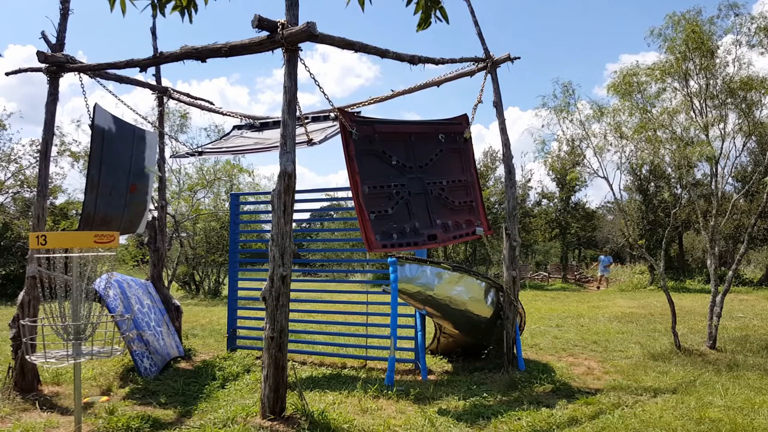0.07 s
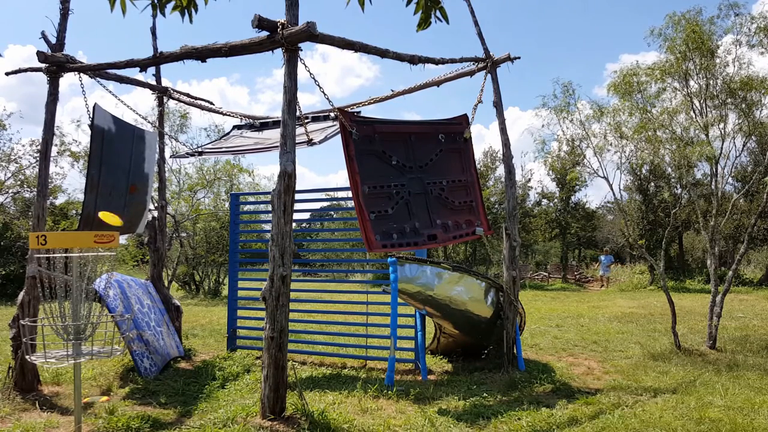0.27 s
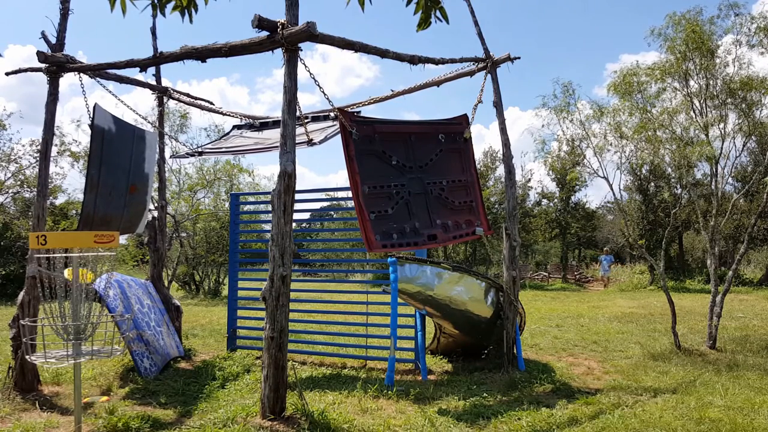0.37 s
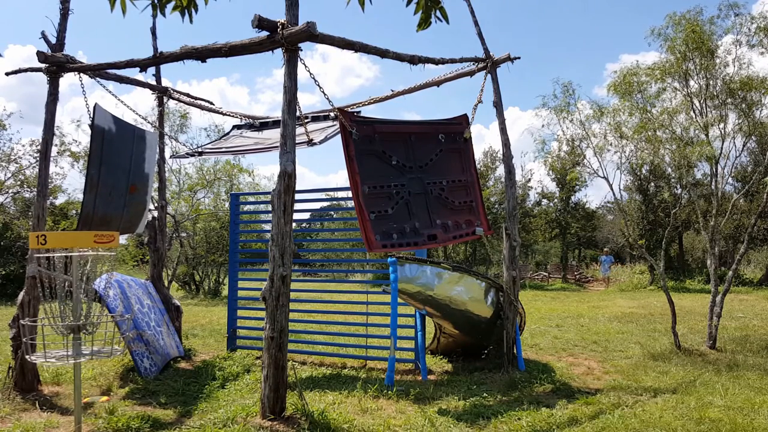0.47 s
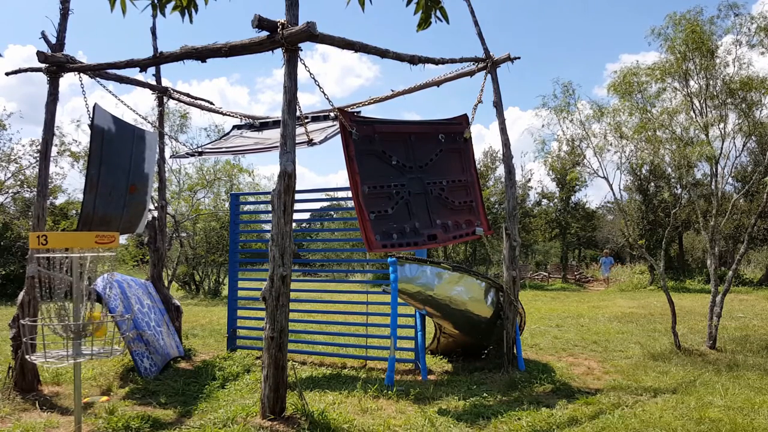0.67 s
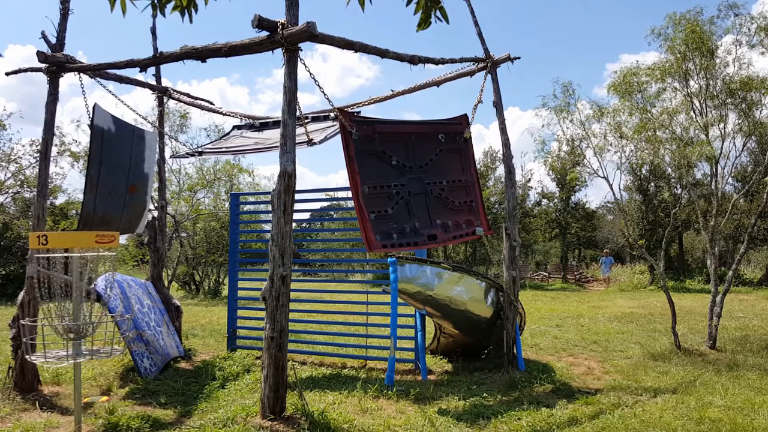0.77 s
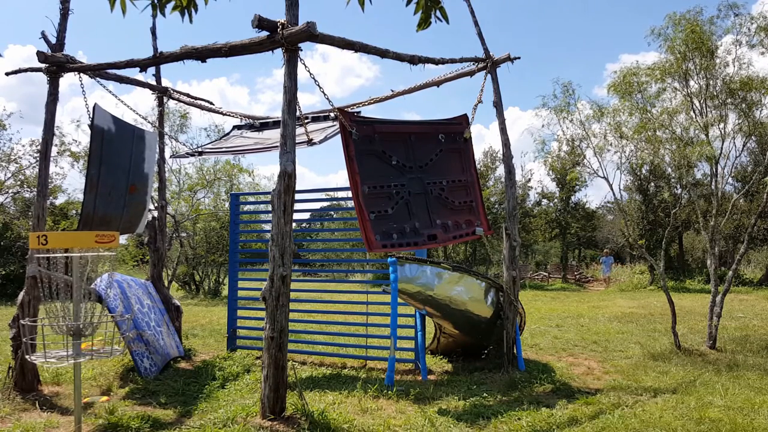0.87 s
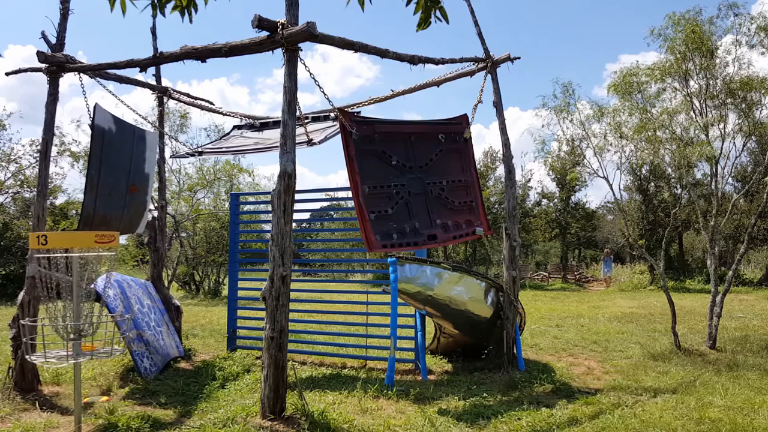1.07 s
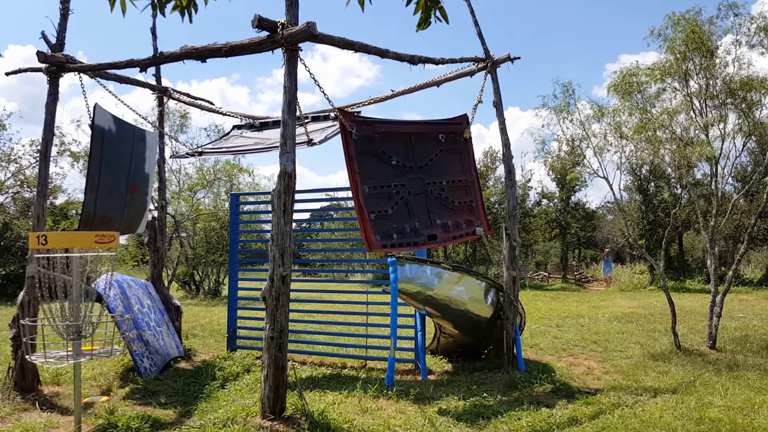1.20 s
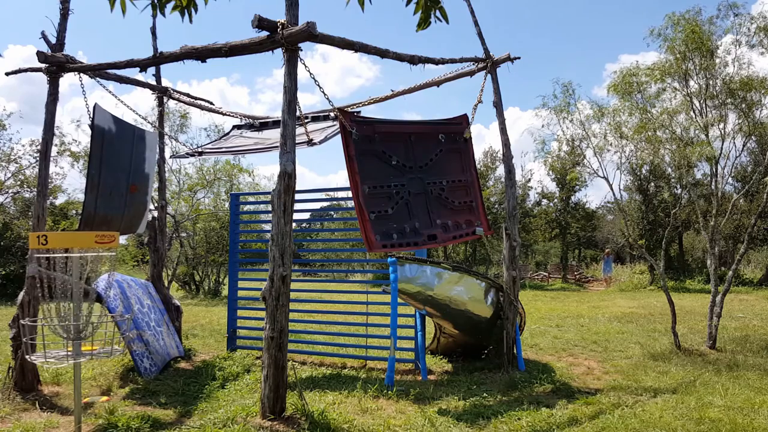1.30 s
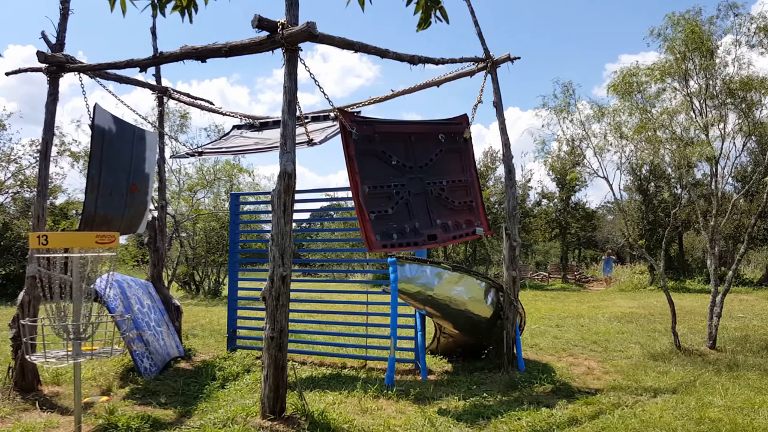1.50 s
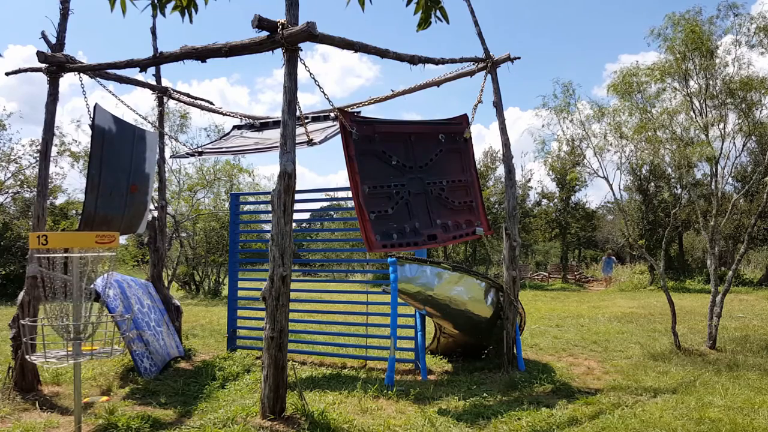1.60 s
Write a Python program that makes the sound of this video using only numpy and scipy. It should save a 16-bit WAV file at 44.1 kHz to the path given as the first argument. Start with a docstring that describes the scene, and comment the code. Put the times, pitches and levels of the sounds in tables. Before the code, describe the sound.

A flying disc strikes a hanging sheet-metal panel with a boom, then crashes into the chains of a steel basket on the left. The links jingle and settle, with one dry knock slightly to the right, on a quiet lawn.

```python
"""A hanging sheet-metal panel, struck by a flying disc, booms as bending waves fill it, then dies away.
The disc glances into the chains of a steel basket on the left: colliding links crash, then jingle in
their high modes as they swing, while the frame and its wires ring. One dry knock, a heavily damped
oscillation, sounds from the right. Beneath it all lies the faint rumble of air over a quiet lawn."""
import sys
import numpy as np
from scipy import signal
from scipy.fft import rfft, irfft
from scipy.io import wavfile
from scipy.ndimage import uniform_filter1d, minimum_filter1d

SR = 44100
rng = np.random.default_rng(int(sys.argv[2]) if len(sys.argv) > 2 else 0)


def to_wav(s):
    """Save 16-bit WAV."""
    ch = np.atleast_2d(s).T  # columns
    pcm = np.round(np.clip(ch, -1, 1) * 32767)  # PCM
    wavfile.write(sys.argv[1], SR, pcm.astype(np.int16))


N = 72765
T = np.arange(N) / SR
HZ = np.fft.rfftfreq(2 * N, 1 / SR)
PANEL_S, BASKET_S, KNOCK_S = 0.205, 0.516, 1.1966  # onsets

# strongest modes of the panel: f/Hz, relative level/dB, T60/s
PANEL_MODES = [(178, -13, 1.3), (210, -14, 1.4), (380, -2, .75), (412, -5, .8), (446, -5.5, .9),
               (505, -2.5, .85), (521, -2, .7), (571, 0, .85), (637, -1, .6), (695, -2, .6), (733, 0, .6),
               (792, -4, .55), (854, -4, .8), (927, -4, .5), (979, -2, .42), (1378, -10, .5),
               (1540, -8, .5)]
# decay times of the dense modes between them: f/Hz, T60/s
DENSE_T60 = [(80, 0.79), (200, 1.36), (500, 1), (1000, 0.75), (1600, 0.63), (4000, 0.44), (12000, 0.63)]
# spectra of the panel's noises: f/Hz, relative density/dB
DENSE_SPECTRUM = [(40, -56), (90, -18.5), (130, -9), (200, -12), (310, -12), (400, -1), (600, 1),
                  (1100, -4.5), (1550, -6.5), (1800, -14.5), (3200, -22.5), (8000, -41), (14000, -46.5)]
THUD_SPECTRUM = [(40, -38), (90, 0.5), (200, -3.5), (500, 6.5), (900, -15), (2000, -17), (8000, -60)]
SLAP_SPECTRUM = [(150, -10), (400, 8.5), (1400, 13.5), (2300, 9.5), (4000, -8), (9000, -17), (14000, -25)]
# modes of a chain link: f/Hz, scatter between links/Hz, relative level/dB, T60/s
LINK_MODES = [(4440, 48, -13.5, 0.17), (9110, 85, -19, 0.075), (11700, 45, -12.5, 0.14),
              (11970, 30, -7.5, .19), (12280, 36, -13.5, 0.22), (12720, 62, -10.5, 0.18),
              (13800, 75, -17, 0.13), (14300, 70, -21, .12)]
# how hard the links collide, and how hard they are set ringing: t/s, relative level/dB
CLATTER_LEVELS = [(.513, -38), (.521, -23), (.555, -26.5), (.59, -20), (.65, -40), (.73, -42.5),
                  (.775, -41.5), (.875, -44), (.895, -31.5), (.94, -43.5), (.97, -38), (1.018, -41.5),
                  (1.09, -41.5), (1.15, -52), (1.31, -55), (1.39, -44.5), (1.5, -61), (1.57, -56.5),
                  (1.65, -60)]
JINGLE_LEVELS = [(.514, -16), (.535, -15.5), (.565, -12), (.6, -6.5), (.64, -22), (.7, -28.5), (.79, -24.5),
                 (.865, -31.5), (.895, -26), (.97, -28.5), (1.005, -28.5), (1.045, -26), (1.09, -27.5),
                 (1.15, -37.5), (1.26, -43), (1.37, -32.5), (1.44, -41), (1.475, -38), (1.515, -49.5),
                 (1.56, -38), (1.65, -48)]
# loudest clinks: t/s, tick level/dB, low mode level/dB, high mode level/dB, high mode f/Hz, T60/s
CLINKS = [(0.517, -32, -21.5, -19, 12700, 0.042), (0.5717, -31, -8, -27, 12650, 0.05),
          (0.5857, -29, -5.5, -22, 12000, 0.019), (0.589, -29, -32.5, -7.5, 12300, 0.5),
          (0.604, -40, -12, -11, 11700, 0.22), (.714, -48, -41, -17, 12100, 0.041),
          (0.772, -34, -36, -23, 14250, .06), (0.8144, -39, -31.5, -27, 12700, 0.11),
          (0.8402, -48, -27.5, -8.5, 12070, 0.052), (0.8844, -20, -26.5, -23, 12730, 0.36),
          (0.964, -25, -48, -15.5, 11970, 0.043), (1.0275, -21.5, -27.5, -22, 12750, 0.098),
          (1.0795, -42, -29.5, -42, 12250, 0.18), (1.4048, -46, -35.5, -47, 12500, 0.24),
          (1.4566, -47, -52, -26.5, 11950, 0.17), (1.554, -50, -63, -34.5, 9290, 0.048),
          (1.601, -37.5, -40, -43, 12400, 0.27)]
# modes of the basket frame: f/Hz, level/dB, T60/s
FRAME_MODES = [(1704, -27, 0.16), (1780, -23, 0.15), (2520, -31, 0.25), (3570, -41, 0.33)]
# taps of the disc on the basket's wires: t/s, level/dB, f/Hz
WIRE_TAPS = [(.527, -16, 1768), (0.551, -21.5, 2900), (0.623, -28, 1760), (0.8126, -41, 2900),
             (0.883, -26, 2900), (0.933, -36, 1780)]
# spectra of link ticks, disc crash, knock tail, drone and air: f/Hz, relative density/dB
TICK_SPECTRUM = [(150, -8), (500, -4.5), (1000, 0), (1400, -13.5), (2300, -2), (2900, -6.5), (3450, 1),
                 (3800, -6.5), (4700, 5), (6000, 3.5), (8000, -1.5), (9200, 8), (10600, -4.5), (12500, -3),
                 (14400, 5)]
CRASH_SPECTRUM = [(400, -18), (1300, -22), (1750, 15.5), (2100, -5), (2500, -7), (3500, 3.5), (5500, 0),
                  (8000, 3.5), (14000, -18)]
KNOCK_SPECTRUM = [(300, -23), (900, 2), (1500, 3.5), (2600, -4), (3800, -4), (9000, -9.5), (14000, -22)]
DRONE_SPECTRUM = [(40, -15.5), (85, -10), (125, -2.5), (200, -13), (400, -20.5), (900, -15), (1500, -22.5),
                  (3000, -14), (8000, -62)]
AIR_SPECTRUM = [(20, -31), (45, -13), (80, 1.5), (130, 2.5), (220, -19.5), (350, -20), (800, -19.5),
                (1500, -25.5), (4000, -34.5), (14000, -36.5)]
# response of the duller right microphone: f/Hz, gain/dB
RIGHT_RESPONSE = [(100, -0.5), (1000, -2), (5500, -4), (7000, -6.5), (8000, -33), (8800, -18.5),
                  (10600, -35), (11700, -16.5), (12400, -10.5), (14200, -13)]


def panel(swell_s=0.1):
    """Impact excites bending waves: the boom swells as they fill the sheet, and low modes last longest."""
    hz, t, spectrum = signal.stft(noise(DENSE_SPECTRUM), SR, nperseg=1024, noverlap=768)
    damping = amp(-60 * np.maximum(t - PANEL_S, 0) / at_frequency(DENSE_T60, hz)[:, None])
    dense = amp(-9) * signal.istft(spectrum * damping, SR, nperseg=1024, noverlap=768)[1][:N]
    modes = amp(-18) * sum(ring(PANEL_S, *mode) for mode in PANEL_MODES)
    swell = np.interp(T - PANEL_S, [0, 0.0037, swell_s], [0, 0.25, 1])
    thud = amp(-18) * decay(PANEL_S, t60=0.29) * noise(THUD_SPECTRUM)  # first push on the sheet
    slap = amp(-12.5) * decay(PANEL_S + 0.002, t60=0.049) * noise(SLAP_SPECTRUM)  # the rim cracks on it
    return thud + slap + swell * (dense + modes)


def collisions(per_s=1500, spread_db=3.8):
    """Link-on-link blows form a Poisson train of impulses of uneven strength."""
    signs = (rng.random(N) < per_s / SR) * rng.choice([-1, 1], N)
    return unit(signs * amp(spread_db * np.minimum(rng.exponential(1, N), 4)))


def chains(links=80, cutoff_hz=4080):
    """Superposition of impulse responses: each collision ticks and rings one of many detuned links."""
    hits = collisions()
    struck_link = rng.integers(0, links, N)
    blows = hits * level_curve(JINGLE_LEVELS)
    t = T[:SR // 6]
    jingle = np.zeros((2, N))
    for link in range(links):
        response = 0
        for hz, scatter_hz, db, t60 in LINK_MODES:
            phase = 0.55 * rng.standard_normal((2, 1))  # links differ in place and orientation
            link_hz = hz + scatter_hz * rng.laplace()
            mode = amp(-60 * t / t60) * np.sin(2 * np.pi * link_hz * t + phase)
            response += amp(db) * mode / np.linalg.norm(mode[0])
        for at in np.flatnonzero(blows * (struck_link == link)):
            jingle[:, at:at + len(t)] += blows[at] * response[:, :N - at]
    tick_energy = filtered(hits ** 2, rfft(decay(0, t60=0.015) ** 2, 2 * N))
    hiss = noise(TICK_SPECTRUM)
    diffuse = 0.45 * np.array([noise(TICK_SPECTRUM), noise(TICK_SPECTRUM)])
    ticks = unit(np.sqrt(abs(tick_energy)) * (hiss + diffuse))
    radiation = 1 / np.sqrt(1 + (cutoff_hz / (HZ + 1)) ** 16)  # small links radiate lows poorly
    return filtered(jingle, radiation) + amp(4) * level_curve(CLATTER_LEVELS) * ticks


def clinks(low_hz=4434, flutter_hz=55):
    """Hard blows tick and ring two link modes; chatter against neighbours modulates their amplitude."""
    ticks = noise(TICK_SPECTRUM) * sum(amp(db) * decay(start, t60=0.039) for start, db, *_ in CLINKS)
    rings = sum(ring(start, low_hz, low_db, t60) + ring(start, high_hz, high_db, t60)
                for start, _, low_db, high_db, high_hz, t60 in CLINKS)
    flutter = unit(filtered(rng.standard_normal((2, N)), 1 / (1 + (HZ / flutter_hz) ** 2)))
    return ticks + rings * unit(1 + 0.28 * flutter)


def basket(resonance_hz=1750, bandwidth_hz=103):
    """The plastic disc crashes in: the frame rings freely, and hums in resonance driven by the chains."""
    resonance = 1 / (1 + 2j * (HZ - resonance_hz) / bandwidth_hz)
    hum = amp(-47) * decay(BASKET_S, t60=4.65) * unit(filtered(collisions(), resonance))
    crash = amp(-23) * decay(BASKET_S, t60=0.38) * noise(CRASH_SPECTRUM)
    return crash + sum(ring(BASKET_S, *mode) for mode in FRAME_MODES) + hum


def wire_taps(wires=6, detuning=0.035):
    """Each tap of the settling disc sets a few wires of nearly equal pitch into free vibration."""
    rings = sum(ring(start, hz * (1 + detuning * offset), db, t60=0.06)
                for start, db, hz in WIRE_TAPS for offset in rng.uniform(-1, 1, wires))
    return rings / np.sqrt(wires)


def knock(hz=1770, time_constant_s=0.00033):
    """A heavily damped oscillation, followed by two near reflections and a short noisy tail."""
    def pulse(delay_s):
        t = np.maximum(T - KNOCK_S - delay_s, 0)
        return t / time_constant_s * np.exp(1 - t / time_constant_s) * np.sin(2 * np.pi * hz * t)
    blow = pulse(0) + amp(-15) * pulse(0.0062) + amp(-32) * pulse(0.0078)
    highpass = signal.butter(2, 880, "high", fs=SR, output="sos")
    tail = amp(-29) * decay(KNOCK_S - 0.0015, t60=0.062) * noise(KNOCK_SPECTRUM)
    return amp(-5.5) * signal.sosfilt(highpass, blow) + tail


def drone(fade_db_per_s=6.5):
    """Low noise lingers after the blow on the panel, in slow exponential decay."""
    return amp(-45.5 - fade_db_per_s * (T - PANEL_S)) * (T > PANEL_S) * noise(DRONE_SPECTRUM)


def air():
    """Outdoor air rumbles faintly as stationary noise."""
    return amp(-54) * noise(AIR_SPECTRUM)


def amp(db):
    """Amplitude ratio of a level in decibels."""
    return 10 ** (np.asarray(db) / 20)


def unit(x):
    """Normalisation to rms 1."""
    return x / np.sqrt(np.mean(x ** 2) + 1e-20)


def at_frequency(points, hz):
    """Interpolation on a logarithmic frequency axis."""
    f, value = np.transpose(points)
    return np.interp(np.log(hz + 1), np.log(f), value)


def level_curve(points):
    """Gain interpolated in decibels, zero before the first point."""
    t, db = np.transpose(points)
    return amp(np.interp(T, t, db)) * (T >= t[0])


def filtered(x, response):
    """Linear filtering as a product of spectra."""
    return irfft(rfft(x, 2 * N) * response)[..., :N]


def noise(spectrum):
    """Gaussian noise of the given spectral shape, rms 1."""
    return unit(filtered(rng.standard_normal(N), amp(at_frequency(spectrum, HZ))))


def decay(start, t60):
    """Exponential decay after an abrupt onset, falling 60 dB in t60 seconds."""
    age = np.maximum(T - start, 0)
    return np.minimum(age * SR / 16, 1) * amp(-60 * age / t60)


def ring(start, hz, db, t60, contact_s=0.0016):
    """A struck mode builds up during contact, then decays as a damped sinusoid."""
    rise = np.clip((T - start) / contact_s, 0, 1)
    return amp(db) * rise * decay(start, t60) * np.sin(2 * np.pi * (hz * T + rng.random()))


def placed(x, left_lag_ms, scatter_db):
    """A difference in arrival time gives direction; posts and ground add scattered reflections."""
    left, right = x * np.ones((2, 1))
    left = filtered(left, np.exp(-2j * np.pi * HZ * left_lag_ms / 1000))
    echoes = rng.standard_normal((2, N)) * (rng.random((2, N)) < 0.1) * decay(0.00195, t60=0.089)
    echoes /= np.linalg.norm(echoes, axis=1, keepdims=True)
    return np.array([left, right]) + amp(scatter_db) * filtered(x, rfft(echoes, 2 * N))


def scene():
    """The pressures of all sources add linearly in the open air."""
    return (placed(panel() + air() + drone(), left_lag_ms=-0.18, scatter_db=-10)
            + placed(chains(), left_lag_ms=-0.23, scatter_db=-1.5)
            + placed(clinks(), left_lag_ms=-0.23, scatter_db=-10)
            + placed(basket() + wire_taps(), left_lag_ms=-0.175, scatter_db=-8)
            + placed(knock(), left_lag_ms=0.11, scatter_db=-12))


def record(dry, ceiling=0.85, band_edge_hz=14560):
    """Treble loss in the right microphone, quick peak limiting, then band limiting."""
    heard = np.array([dry[0], filtered(dry[1], amp(at_frequency(RIGHT_RESPONSE, HZ)))])
    allowed_gain = ceiling / np.maximum(abs(heard).max(0), ceiling)
    smooth_gain = uniform_filter1d(minimum_filter1d(allowed_gain, size=300), size=300)
    lowpass = signal.firwin(801, band_edge_hz, window=("kaiser", 8), fs=SR)
    return signal.oaconvolve(heard * smooth_gain, lowpass[None], "same")


dry = scene()
out = record(dry)
to_wav(out)
```